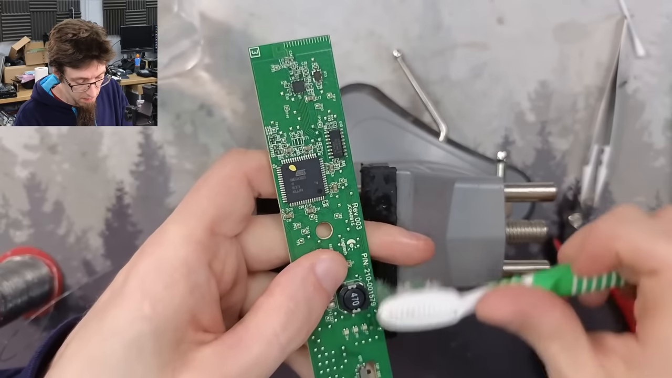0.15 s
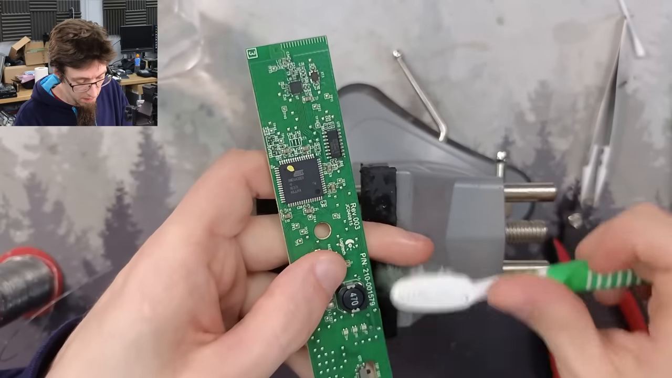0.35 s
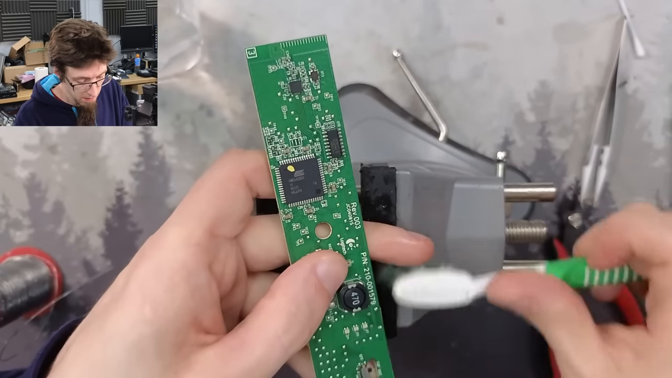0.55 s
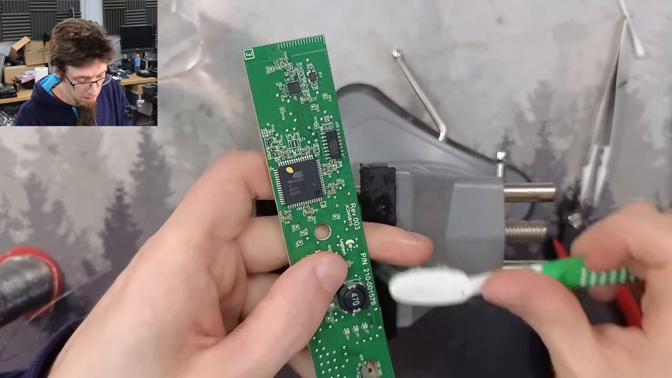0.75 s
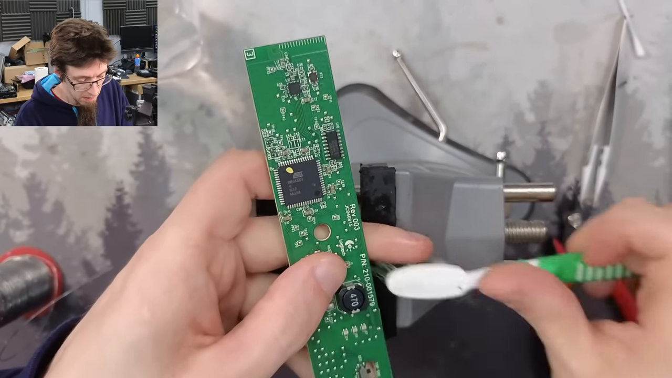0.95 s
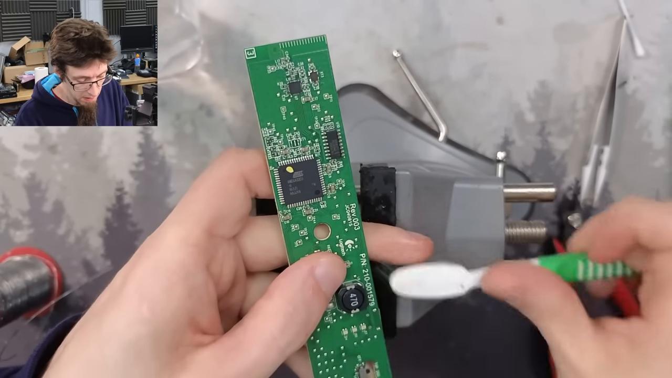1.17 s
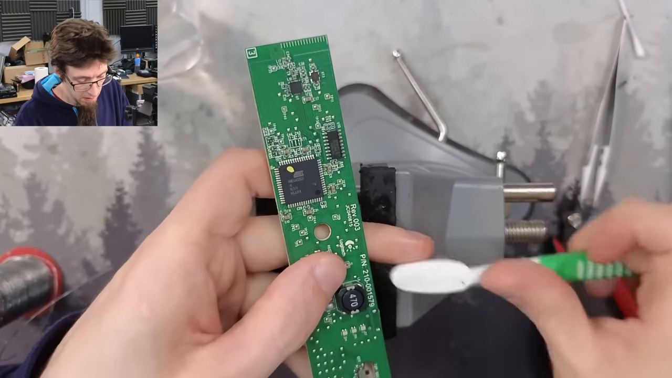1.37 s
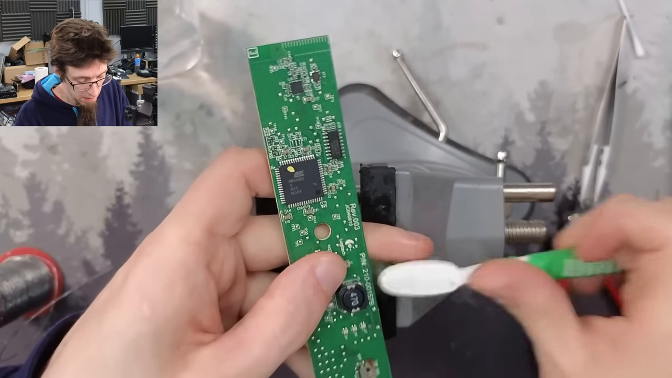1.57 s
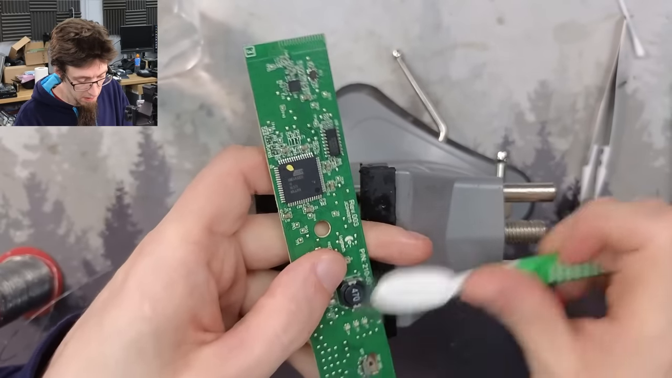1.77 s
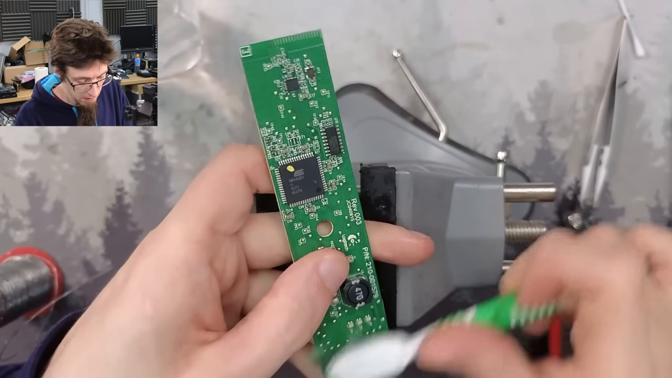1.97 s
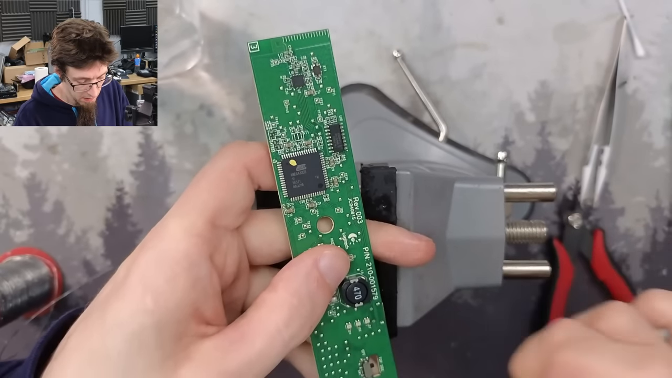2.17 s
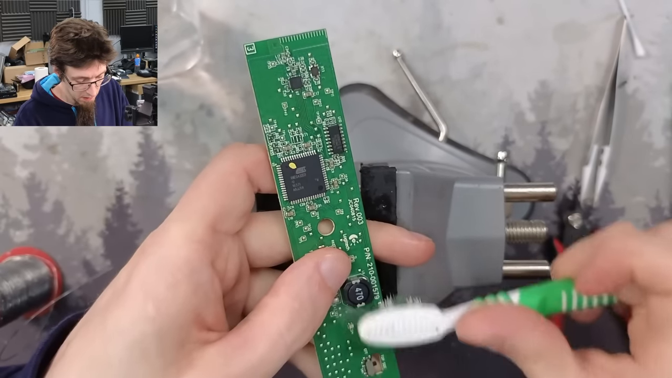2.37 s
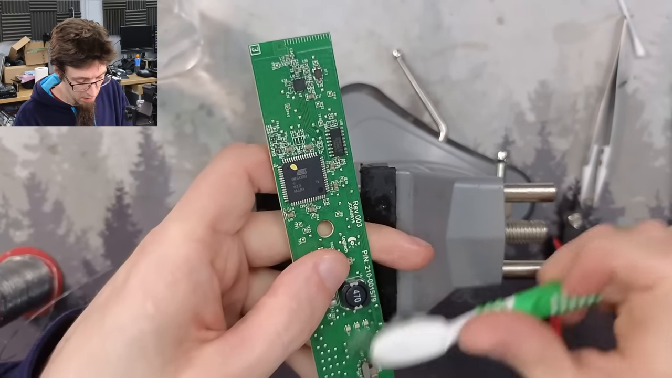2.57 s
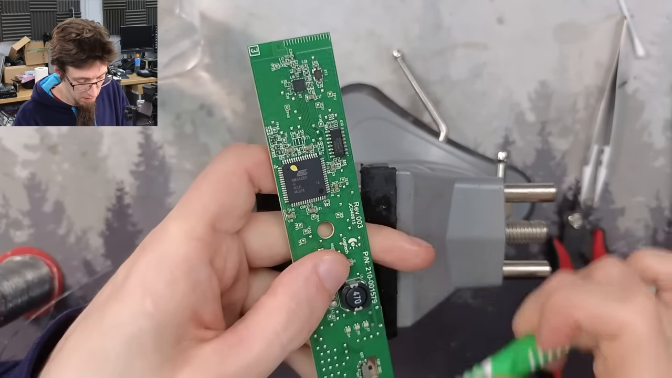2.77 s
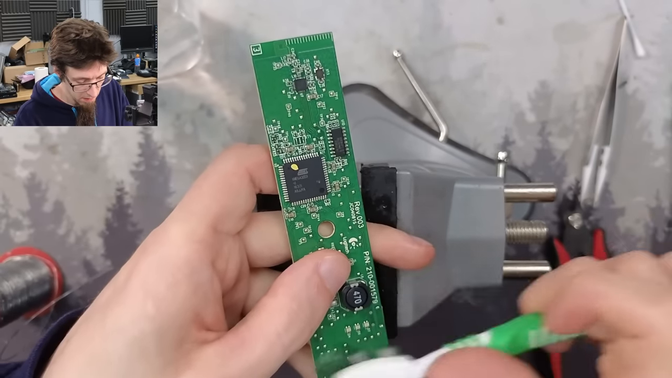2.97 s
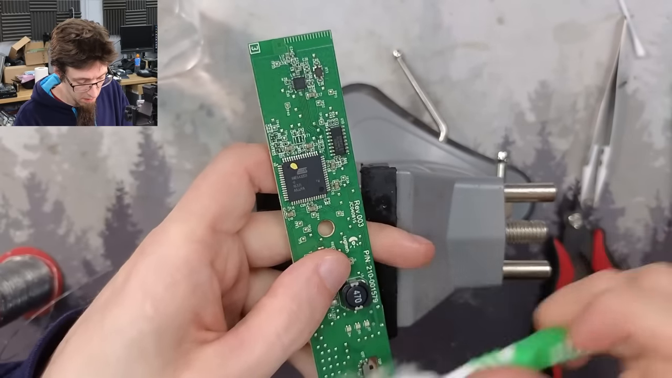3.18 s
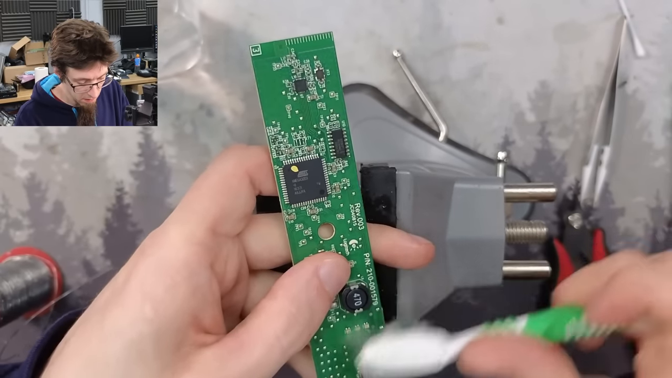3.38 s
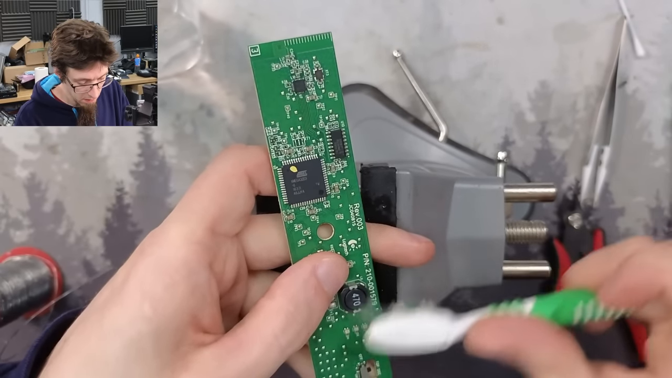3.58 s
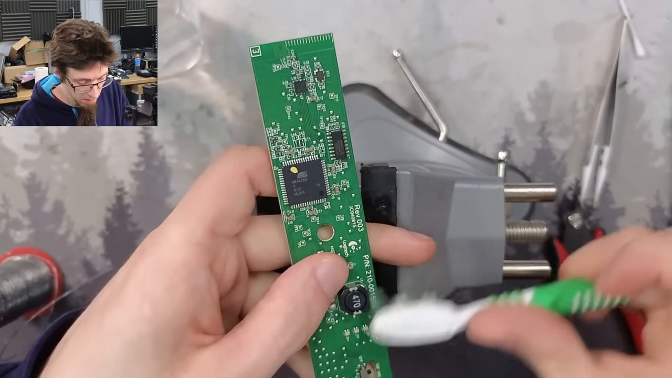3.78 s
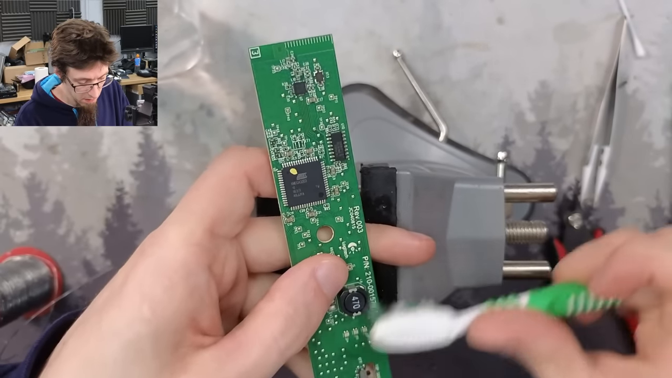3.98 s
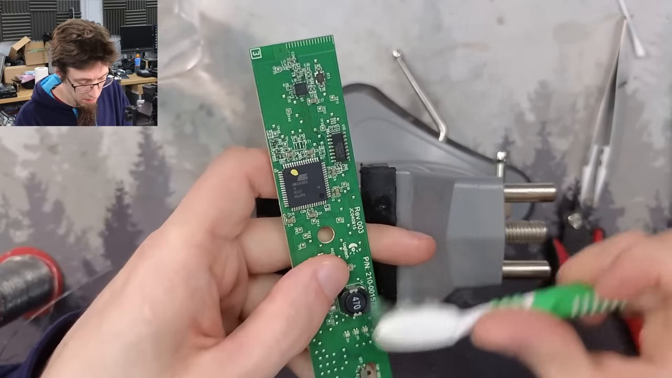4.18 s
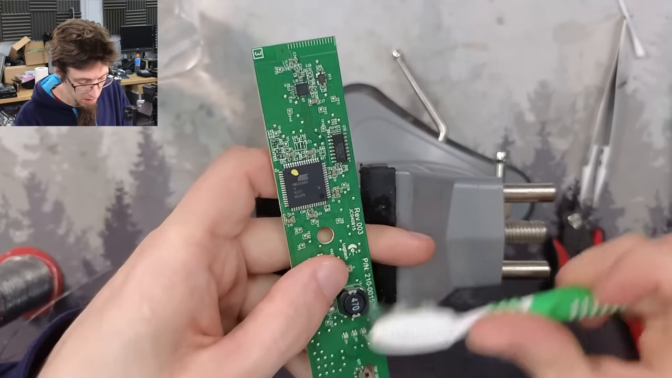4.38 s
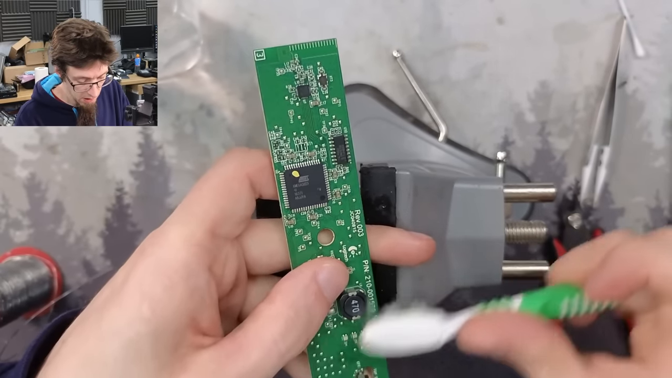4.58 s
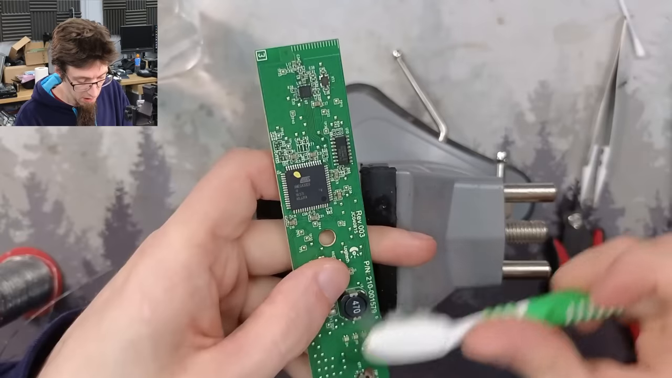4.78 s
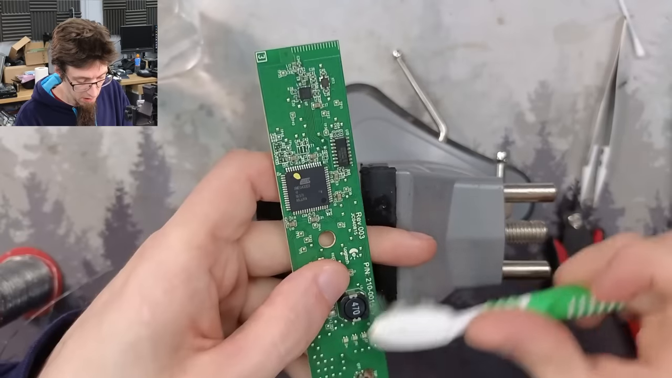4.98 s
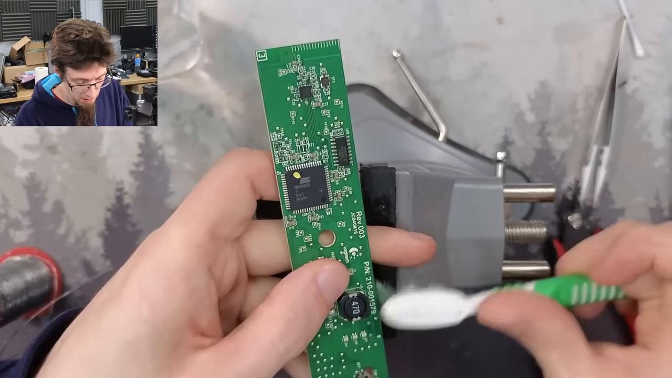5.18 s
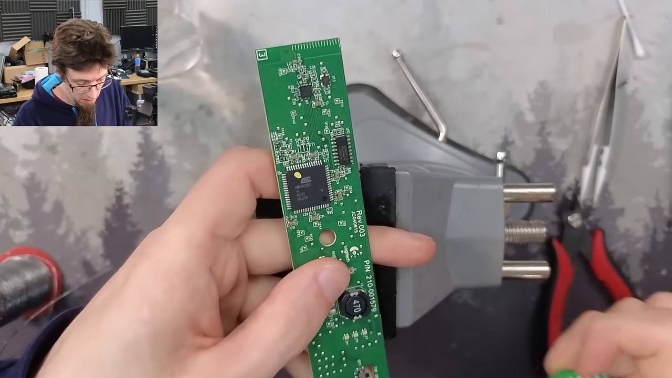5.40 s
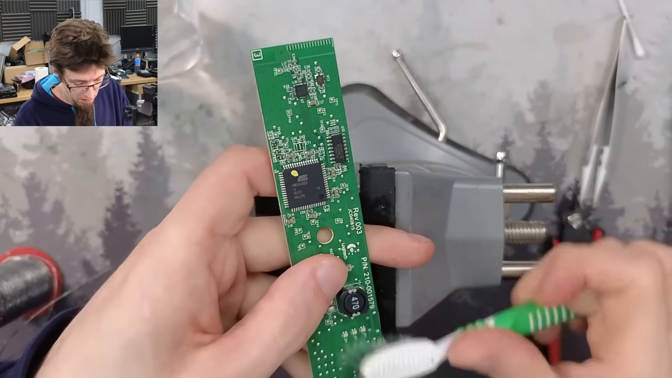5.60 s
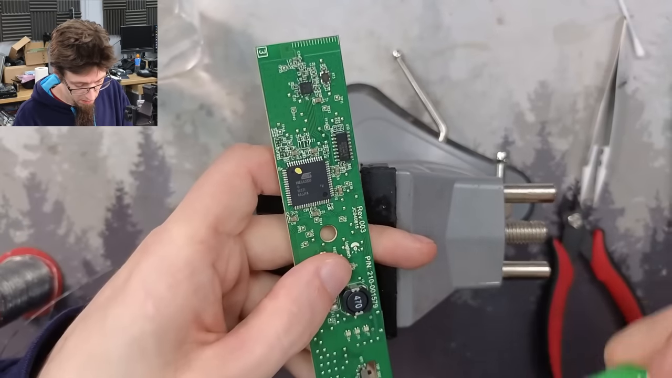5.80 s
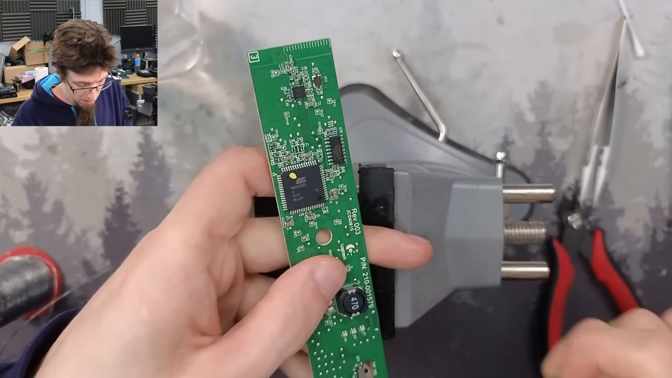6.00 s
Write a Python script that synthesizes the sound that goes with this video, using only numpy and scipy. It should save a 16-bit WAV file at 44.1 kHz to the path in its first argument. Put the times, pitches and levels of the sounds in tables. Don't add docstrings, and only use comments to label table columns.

```python
import sys
import numpy as np
from scipy import signal
from scipy.fft import rfft, irfft, next_fast_len
from scipy.io import wavfile
from scipy.ndimage import uniform_filter1d

SR = 44100
rng = np.random.default_rng(int(sys.argv[2]) if len(sys.argv) > 2 else 0)


def makeup_ratio(level_db):
    decades = np.asarray(level_db, float) / 20
    return 10 ** decades


def wav_record(signal):
    frames = np.transpose(np.atleast_2d(signal))
    bounded = np.clip(frames, -1, 1)
    quanta = np.round(bounded * 32767).astype(np.int16)
    wavfile.write(sys.argv[1], SR, quanta)


N = 266716
T = np.arange(N) / SR

# (frequency [Hz], level [dB per Hz])
BRISTLE = [(1650, -49), (2800, -10), (3360, 0.5), (5400, -5.5), (5890, 1.5), (7170, -7), (7440, -1),
           (8120, 1), (10200, -4), (11300, 0.5), (12200, -6), (14100, 1), (16000, -13.5)]
# (frequency [Hz], level [dB per Hz])
BOARD = [(220, -23), (380, -4), (1010, -3), (1150, -6), (1380, -1), (1540, -3), (2200, 1.5), (2780, -11),
         (3000, -3), (3900, -21), (6600, -120)]
# (brisk stroke [dB], slow stroke [dB])
EASED_BOARD_DB = (-9.5, -6)
BOARD_DB, SQUEAK_DB = (-8, -14), (-0.23, 1.9)
SQUEAK_HZ = 5790
TIRED_S, TIRED_SQUEAK_DB = 5.2, 1.3
LIGHT_TILT_DB, LIGHT_PATCHY = -15.5, 1.7


def brush():
    hiss_db, pressure, stroke = stroke_controls()
    lean_db = np.transpose(LANDINGS)[3]
    board_db = (manner(BOARD_DB) + lean_db)[stroke]
    squeak_db = manner(SQUEAK_DB)[stroke] + TIRED_SQUEAK_DB * (T > TIRED_S)
    light = 1 - pressure

    tips = flicks(9000, spread_db=1.0) * makeup_ratio(0.84 * walk(250))
    patchy_db = 2.25 * (1 + (LIGHT_PATCHY - 1) * light)
    hiss = 0
    for k, hz in enumerate(np.geomspace(2800, 16000, num=36)):
        ratio = hz / SQUEAK_HZ
        octaves_off = max(np.log2(SQUEAK_HZ / hz), np.log2(hz / 9500), 0)
        tuft_db = patchy_db * ratio ** 0.24 * walk(30) + LIGHT_TILT_DB * light * octaves_off
        tuft_db += 2 * squeak_db * (abs(np.log2(ratio)) < .1)
        hiss = hiss + (-1) ** k * slow_amp(tuft_db) * resonate(tips, hz, 24 * ratio ** 0.41)

    drag = flicks(2300, spread_db=0.5) * makeup_ratio(2.5 * walk(120))
    board = 0
    for k, hz in enumerate(np.geomspace(400, 2900, num=16)):
        mode_db = 3.6 * walk(35) + 0.41 * (board_db + 5.5) * (hz < 1000)
        board = board + (-1) ** k * slow_amp(mode_db) * resonate(drag, hz, 9.1)
    board_gain = makeup_ratio(board_db + manner(EASED_BOARD_DB)[stroke] * light)
    board = board_gain * level(colour(board, BOARD), 0.98)
    return makeup_ratio(hiss_db) * (level(colour(hiss, BRISTLE), -0.54) + board)


# (landing [s], full contact [s], lift-off [s], force at lift-off [dB], landing softness [dB])
BRISK = [(.02, .06, 0.126, -40.5, -13), (.247, .273, 0.32, -42.5, -8.5), (.443, .492, 0.53, -42, -11.5),
         (.641, .676, 0.74, -42, -11.5), (.854, .888, 0.95, -43, -11), (1.067, 1.11, 1.157, -40, -14.5),
         (1.282, 1.316, 1.365, -42.5, -13.5), (1.49, 1.53, 1.578, -42.5, -9.5),
         (1.712, 1.737, 1.797, -41.5, -11.5), (1.94, 1.965, 2.039, -43, -7),
         (2.976, 3.03, 3.092, -43.5, -23), (3.24, 3.27, 3.326, -43, -6.5), (3.443, 3.482, 3.537, -42, -14),
         (3.647, 3.676, 3.735, -41.5, -16), (3.852, 3.897, 3.934, -40.5, -16.5),
         (4.053, 4.083, 4.131, -42, -16.5), (4.256, 4.289, 4.345, -42.5, -14.5),
         (4.444, 4.481, 4.536, -42.5, -13.5), (4.644, 4.686, 4.726, -42, -21),
         (4.848, 4.89, 4.923, -42.5, -10.5), (5.06, 5.098, 5.139, -44, -15)]
# (landing [s], full contact [s], lift-off [s], force at lift-off [dB], landing softness [dB])
SLOW = [
    (2.193, 2.225, 2.298, -46.5, -5.5),
    (2.483, 2.553, 2.61, -49, -15.5),
    (2.737, 2.8, 2.865, -48.5, -25),
    (5.282, 5.308, 5.4, -51, -10.5),
    (5.6, 5.63, 5.73, -52.5, -11),
    (5.914, 5.948, 6.03, -50, -14.5),
]
APPROACH_S, APPROACH_DB = .016, -16.5
SETTLE_S, SETTLED_DB = 0.016, 1.6
DIG_DB, SWELL_DB = (-3.5, -1), (2, 2.5)
SPRING_S = 0.022
SPRING_DB, FADE_DB_S = (-17.5, -10.5), (180.5, 275)


def stroke_controls():
    land_s, press_s, lift_s, lift_db, soft_db = np.transpose(sorted(BRISK + SLOW))
    land_db = lift_db + soft_db
    press_db = lift_db + manner(DIG_DB)
    swell_db = (press_db + lift_db) / 2 + manner(SWELL_DB)
    drop_db = manner(SPRING_DB)
    free_s = lift_s + SPRING_S
    free_db = lift_db + drop_db
    end_s = np.maximum(np.append(land_s[1:] - APPROACH_S, T[-1]), free_s)
    end_db = free_db - manner(FADE_DB_S) * (end_s - free_s)

    settled_s = np.minimum(land_s + SETTLE_S, press_s)
    swell_s = (press_s + lift_s) / 2
    knots = [land_s - .002, land_s, settled_s, press_s, swell_s,
             lift_s, lift_s + .3 * SPRING_S, free_s, end_s]
    db = [land_db + APPROACH_DB, land_db, land_db + SETTLED_DB, press_db, swell_db,
          lift_db, lift_db + 0.66 * drop_db, free_db, end_db]
    force = [0.015, 0.019, 0.13, 0.42, 0.77, 1.0, 0.98, 1, 0.35]
    knots = np.transpose(knots).ravel()
    hiss_db = np.interp(T, knots, np.transpose(db).ravel(), left=-90)
    pressure = np.interp(T, knots, np.tile(force, len(land_s)))
    stroke = np.maximum(np.searchsorted(land_s - APPROACH_S, T) - 1, 0)
    return hiss_db, pressure, stroke


def manner(pair):
    return np.array([pair[row in SLOW] for row in sorted(BRISK + SLOW)])


# (time [s], peak [dB], main ring [Hz], lean on the board [dB])
LANDINGS = [(0.0207, -37.7, 7800, 0.1), (0.2465, -34.5, 7800, 0.7), (0.4443, -37.4, 6290, -0.1),
            (0.6414, -38.6, 7250, 0.6), (0.854, -36.0, 8120, 1.7), (1.066, -36.8, 6270, 2.3),
            (1.2815, -39.2, 7780, 1.2), (1.4905, -35.4, 6430, 1.9), (1.713, -30.8, 8120, 3.2),
            (1.94, -39.3, 9600, 2.2), (2.1934, -29.9, 5840, -1.6), (2.483, -41.2, 5710, 0.3),
            (2.735, -51.1, 5540, -4.9), (2.9753, -45.6, 7430, 1.8), (3.2405, -33.4, 7870, -1.1),
            (3.4431, -46.3, 7500, 0.6), (3.6471, -41.0, 7730, 0.7), (3.8516, -44.0, 7760, 3.6),
            (4.054, -37.6, 7700, 0.9), (4.2558, -40.0, 7810, -0.1), (4.4448, -44.6, 7400, -2.5),
            (4.6443, -45.6, 7600, 0.7), (4.8484, -32.9, 7740, 0.0), (5.0599, -39.6, 8380, 1.4),
            (5.2849, -39.5, 8600, -1.7), (5.6067, -46.9, 8340, -3.3), (5.917, -46.3, 7566, 1.2)]
# (time [s], peak [dB], main ring [Hz])
TICKS = [(0.587, -43, 6030), (.7963, -51.5, 8670), (.127, -33, 6440), (1.2225, -40.5, 8030),
         (1.4175, -44, 9650), (1.52, -35, 6070), (1.717, -33.5, 8200), (1.7455, -36.5, 9970),
         (1.857, -38, 5970), (1.9737, -29.5, 8560), (2.2298, -29.5, 8030), (2.5311, -43, 7650),
         (2.779, -37.5, 7650), (2.9116, -51, 7860), (3.0278, -33, 7800), (3.1529, -52, 7990),
         (3.469, -42, 7770), (3.795, -41.5, 8130), (3.982, -50, 3500), (4.189, -49, 3010),
         (4.396, -48, 7960), (4.586, -40.5, 8100), (4.792, -50, 8060), (4.9923, -44, 7800),
         (5.208, -52, 8000), (5.2976, -43, 7910), (5.935, -48.5, 7940)]
# (frequency [Hz], level [dB], time to fall 60 dB [s])
TUFT = [(3600, -18.5, 0.03), (5840, -9.5, 0.029), (7754, -1, 0.017), (9850, -3, 0.012), (11230, -7, 0.011),
        (13300, -13, 0.011)]
TIRED_DB = -8


def ticks():
    out = np.zeros(N)
    rows = [(s, db + TIRED_DB * (s > TIRED_S), hz) for s, db, hz, _ in LANDINGS] + TICKS
    for (s, db, hz), chance in zip(rows, rng.standard_normal(size=(len(rows), 500))):
        modes = [(hz, -2.5, .018)]
        for (mode_hz, mode_db, t60), c, e in zip(TUFT, chance, chance[9:]):
            modes.append((mode_hz * (1 + .03 * c), mode_db + 3 * e, t60))
        snaps = chance ** 3 * np.exp(-T[:len(chance)] / 0.0059)
        burst = np.convolve(ring(modes, 0.00021), snaps)
        add(out, s, makeup_ratio(db - 2.5) * burst / np.abs(burst).max())
    return out


# (time [s], peak [dB], ring [Hz], hollow mode [dB], side rings [dB])
RAPS = [
    (.0876, -9, 2430, -31.5, -13),
    (.1112, -11, 3070, -14.5, -7),
    (.1164, -18, 2230, -18, -6.5),
    (1.1399, -12.5, 2375, -20.5, -16),
    (1.1551, -17, 2280, -15, -11),
    (5.6114, -21.5, 2013, -23, -27),
]
# (time [s], peak [dB], ring [Hz], hollow mode [dB])
KNOCKS = [(0.3211, -38.5, 3580, -18), (.5194, -40, 3540, -19), (.733, -39, 1740, -23),
          (0.9313, -51, 1910, -22), (1.192, -32.5, 2240, -14.5), (1.3642, -29.5, 2240, -42),
          (1.5787, -43, 1650, -10.5), (1.7969, -32.5, 2250, -32.5), (2.0293, -44.5, 2050, -24.5),
          (2.202, -45.5, 1880, -31.5), (2.487, -50.5, 1830, -29), (3.0838, -36.5, 2190, -12.5),
          (3.246, -38, 2120, -18), (3.545, -43, 2132, -22), (3.5882, -43.5, 2250, -16),
          (3.723, -43, 1800, -10), (3.9814, -41, 2240, -5), (4.1262, -32.5, 1644, -30),
          (4.1699, -44.5, 1840, -11), (4.337, -44.5, 2080, -15), (4.5244, -42, 1676, -8),
          (4.572, -43, 1904, -20), (4.9196, -37, 1794, -9), (4.9675, -44.5, 1880, -13),
          (5.1288, -44, 2130, -13), (4.7693, -47, 2460, -18.5), (4.1344, -46, 2200, -20),
          (6.0424, -48, 1500, -6)]
# (time [s], peak [dB])
TAPS = [(3.576, -56), (3.589, -46), (3.608, -60), (3.625, -58), (3.6394, -58), (3.656, -61), (3.7397, -53),
        (3.7687, -53), (3.78, -54), (3.8083, -53), (3.939, -48), (3.9686, -47), (4.0074, -53),
        (4.021, -53.5), (4.037, -53), (4.052, -61), (4.068, -58)]
SIDE_RINGS = [.72, 1.35]
# (frequency [Hz], level [dB], time to fall 60 dB [s])
THUD = [(126, -3, 0.12), (259, -1, 0.029), (464, -3.5, 0.021)]
# (frequency [Hz], time to fall 60 dB [s])
BENCH = [(33, 0.24), (93, 0.8), (298, 0.16)]
# (time [s], thud [dB], first, second and third bench mode [dB each])
JOLTS = [
    (0.111, -41, -19, -44, -37.5),
    (1.157, -45, -30.5, -37, -44.5),
    (1.366, -44, -46.5, -58, -61.5),
    (1.795, -42, -38, -42.5, -55),
    (3.738, -33.5, -30, -36.5, -59),
    (5.612, -45, -47.5, -46.5, -47.5),
]
# (time [s], peak [dB])
BUMPS = [(0.359, -50), (1.492, -49), (1.545, -49), (1.712, -48), (1.936, -48), (3.441, -49), (3.541, -44),
         (4.3, -47), (4.649, -56), (4.838, -43), (5.501, -57.5), (6.039, -45)]
CONTACT_S, AFTER_RING_DB, RING_T60_S = 0.0012, -13, 0.021
HOLLOW_HZ, HOLLOW_T60_S = 920, 0.028
TAP_HZ, TAP_HOLLOW_DB, SIDE_DB, BUMP_DB = 1329.6, -2, -11.5, -3.5
USUAL_DB = -43
THUD_DB, THUD_PER_DB = -13.5, -0.33


def knocks():
    air, bench = np.zeros(N), np.zeros(N)
    t = T[:SR // 80]
    contact = np.exp(-((t - 1.28 * CONTACT_S) / CONTACT_S) ** 2)
    rows = RAPS + [(*row, SIDE_DB) for row in KNOCKS]
    rows = rows + [(s, db, TAP_HZ, TAP_HOLLOW_DB, SIDE_DB) for s, db in TAPS]
    for (s, db, hz, hollow_db, side_db), chance in zip(rows, rng.standard_normal(len(rows))):
        clack = np.sin(2 * np.pi * hz * t)
        for ratio in SIDE_RINGS:
            clack += makeup_ratio(side_db) * np.sin(2 * np.pi * hz * ratio * t)
        add(air, s, makeup_ratio(db - 5.0) * contact * clack)
        hollow = (HOLLOW_HZ * (1 + 0.071 * chance), hollow_db + 7.5, HOLLOW_T60_S)
        add(air, s, makeup_ratio(db - 2.5) * ring([(hz, AFTER_RING_DB, RING_T60_S), hollow], 0.0011))
        thud_db = THUD_DB + THUD_PER_DB * (db - USUAL_DB)
        add(air, s, makeup_ratio(db + thud_db + 7.0) * ring(THUD, .001))

    for s, thud_db, *mode_db in JOLTS:
        add(bench, s, makeup_ratio(thud_db) * ring(THUD, 0.00073))
        modes = [(hz, db, t60) for (hz, t60), db in zip(BENCH, mode_db)]
        add(bench, s, ring(modes, 0.00059))
    for s, db in BUMPS:
        add(bench, s, makeup_ratio(db + BUMP_DB) * ring(THUD, 0.00092))
    return air, bench


# (time [s], peak [dB], low modes [dB], long-ringing modes [dB])
CLINKS = [
    (0.0879, -15.5, 6, -1.5),
    (0.105, -35, -0.5, -2),
    (0.1118, -15.5, -10.5, -3),
    (0.1158, -18, -7, -2),
    (0.1172, -19, -6.5, 0.5),
    (1.1404, -21.5, 6, 0),
    (1.146, -29.5, -2.5, -6),
    (1.158, -23, -3, 2),
    (1.197, -50, 9, -17),
]
# (frequency [Hz], level [dB], time to fall 60 dB [s])
STEEL = [(4000, -19.5, 0.091), (4260, -34.5, 0.29), (5330, -8.5, 0.02), (8266, 0, 0.089),
         (8350, -10, 0.037), (8300, -35, 0.26), (8030, -16, 0.074), (8360, -15.5, .09), (8240, -6, .07),
         (8250, -36, .4), (10940, -9, 0.11), (10770, -38, 0.67), (13340, -16, 0.12), (14400, -26, .2)]
RATTLE_DB, RATTLE_RAD = 2.6, .9
HIGH_PER_DB = 0.06
CRACK_DB = -8


def steel():
    out = np.zeros(N)
    hz, _, t60 = np.transpose(STEEL)[:, :, None]
    rattle = []
    for _ in STEEL:
        strength = slow_amp(RATTLE_DB * walk(250)[:2 * SR])
        rattle.append(strength * np.cos(RATTLE_RAD * walk(120)[:2 * SR]))
    rattle = np.array(rattle)
    for (s, db, low_db, free_db), chance in zip(CLINKS, rng.standard_normal((len(CLINKS), len(STEEL), 1))):
        struck_db = low_db * (hz < 6000) + HIGH_PER_DB * low_db * (hz > 10000)
        mix_db = 1.5 * chance + np.where(t60 > .25, free_db, struck_db)
        crack = resonate(rng.standard_normal(SR // 30), 2900, 1.3) * np.exp(-T[:SR // 30] / 0.0087)
        add(out, s, makeup_ratio(db + low_db + CRACK_DB) * crack)
        shaken = rattle[:, int(s * SR):][:, :int(SR * t60.max())]
        add(out, s, makeup_ratio(db - 4.0) * ring(STEEL, 0.00024, makeup_ratio(mix_db) * shaken))
    return out * makeup_ratio(1.6 * walk(60.3))


# (time [s], length [s], level [dB], ring [Hz])
CREAK = [
    (1.401, 0.11, -63, 920),
    (3.282, .12, -64, 920),
    (3.576, 0.13, -61, 930),
    (3.741, 0.06, -54, 980),
    (3.965, .12, -60.5, 924),
]
CREAK_ATTACK_S, CREAK_RELEASE_S, CREAK_EDGE_DB = 0.015, 0.032, -4


def creak():
    out = np.zeros(N)
    slips = flicks(1500, spread_db=1.3) * makeup_ratio(2.4 * walk(70))
    for s, length, db, hz in CREAK:
        span = slice(int(s * SR), int((s + length) * SR))
        rise, fall = (T[span] - s) / CREAK_ATTACK_S, (s + length - T[span]) / CREAK_RELEASE_S
        inside = np.minimum(np.minimum(rise, fall), 1)
        hollow = resonate(resonate(slips[span], hz, 4), hz, 4)
        upper = resonate(resonate(slips[span], 1.94 * hz, 2.3), 2.3 * hz, 2.2)
        out[span] = level(hollow + makeup_ratio(-14) * upper, -2.5) * makeup_ratio(db + CREAK_EDGE_DB * (1 - inside))
    return out


# (time [s], sway [Hz], sway [dB], shake [dB])
ROCKING = [(0, 12.94, -41, -39.5), (.12, 14.31, -35, -25.5), (.27, 13.9, -28.5, -35.5),
           (.52, 14.14, -27.5, -33.5), (1.03, 14.8, -33.5, -41), (1.26, 14.5, -45.5, -51.5),
           (1.4, 14.3, -28, -32), (2.05, 14.2, -23, -36), (2.21, 16.3, -31, -39), (2.4, 15.5, -53.5, -60.5),
           (2.66, 15.3, -26, -43.5), (3.23, 15.5, -49, -51.5), (3.37, 15.43, -27, -33),
           (4.9, 16.35, -24.5, -37), (5.24, 14.7, -20.5, -41), (5.69, 14.3, -31.5, -46),
           (5.91, 14.9, -57.5, -66.5), (6.05, 16, -34, -49.5)]
# (frequency [Hz], level [dB per Hz])
RUMBLE = [(13, -28), (22, 2.5), (31, 6), (75, -24.5), (99, -29), (232, -50), (295, -43.5), (350, -49),
          (400, -56.5), (520, -81.5), (880, -120)]
PULSE_DB = 4.5
DRUM_DB, DRUM_PER_DB, DRUM_JOLT_DB, DRUM_FADE_DB_S = -56.5, 0.66, -2.5, 130
PANEL_DB, PANEL_PER_DB, PANEL_JOLT_DB, PANEL_FADE_DB_S = -74, 0.76, -31, 30
HUM_S, HUM_LENGTH_S, HUM_DB = .585, 0.235, -58.5


def rocking():
    s, *columns = np.transpose(ROCKING)
    sway_hz, sway_db, shake_db = (np.interp(T, s, c) for c in columns)
    sway = np.sqrt(2) * makeup_ratio(sway_db) * np.sin(2 * np.pi * np.cumsum(sway_hz) / SR)

    extra_db = shake_db - USUAL_DB
    drum_gain = makeup_ratio(DRUM_DB + DRUM_PER_DB * extra_db)
    drum_gain = drum_gain + makeup_ratio(DRUM_JOLT_DB) * shudder(column=3, fade_db_s=DRUM_FADE_DB_S)
    loose = makeup_ratio(PANEL_DB) + makeup_ratio(PANEL_JOLT_DB) * shudder(column=4, fade_db_s=PANEL_FADE_DB_S)
    panel_gain = makeup_ratio(PANEL_PER_DB * extra_db) * loose

    panel_hz = BENCH[2][0]
    wavering_hz = panel_hz * (.99 + .012 * walk(26.2))
    note = makeup_ratio(1.6 * walk(17.6)) * np.sin(2 * np.pi * np.cumsum(wavering_hz) / SR)
    hum = level(note, HUM_DB) * np.exp(-((T - HUM_S) / HUM_LENGTH_S) ** 8)

    digging = uniform_filter1d(np.clip((stroke_controls()[0] + 60) / 20, 0, 1), SR // 40)
    shake = rng.standard_normal(N) * makeup_ratio(2.6 * walk(15) + PULSE_DB * digging)
    rumble = makeup_ratio(shake_db) * level(colour(shake, RUMBLE, 14, 60), 0.15)
    drum = drum_gain * level(colour(shake, RUMBLE, 71, 230), 0.15)
    panel = colour(shake, RUMBLE, 200, 600)
    panel += makeup_ratio(6.0) * resonate(resonate(panel, panel_hz, 22), panel_hz, 22)
    return sway + hum + rumble + drum + panel_gain * level(panel, 0.15)


def shudder(column, fade_db_s):
    return sum(slow_amp(row[column] - fade_db_s * (T - row[0])) * (T > row[0]) for row in JOLTS)


ROOM_DB, ROOM_T60_S, ROOM_GAP_S = -18.5, 0.24, 0.0058


def room(x):
    t = T[:SR // 2]
    tail = rng.standard_normal(len(t)) * np.exp(-np.log(1000) * t / ROOM_T60_S) * (t > ROOM_GAP_S)
    tail = colour(tail, [(300, 15.5), (4000, 0), (15000, -8.5)])
    return signal.fftconvolve(x, makeup_ratio(ROOM_DB) * tail / np.sqrt(np.sum(tail ** 2)))[:N]


PATCH_HZ, PATCH_S, PATCH_SHARE = 700, .07, .3


def patches(x):
    hz, s, z = signal.stft(x, SR, nperseg=1024)
    band = (hz / PATCH_HZ).astype(int)[:, None]
    chance = rng.random((band.max() + 1, int(s[-1] / PATCH_S) + 3))
    moment = 1 + (s / PATCH_S + chance[band, 0]).astype(int)
    kept = chance[band, moment] < PATCH_SHARE
    return signal.istft(z * kept, SR, nperseg=1024)[1][:N] / np.sqrt(PATCH_SHARE)


def level(x, db):
    return x * makeup_ratio(db) / np.sqrt(np.mean(x ** 2))


def colour(x, points, lo_hz=1., hi_hz=22050.):
    size = next_fast_len(len(x))
    hz = np.maximum(np.arange(size // 2 + 1) * SR / size, 1e-3)
    at, db = np.transpose(points)
    edges = 1 / np.sqrt((1 + (lo_hz / hz) ** 12) * (1 + (hz / hi_hz) ** 12))
    gain = makeup_ratio(np.interp(np.log(hz), np.log(at), db)) * edges
    return irfft(rfft(x, size) * gain, size)[:len(x)]


def walk(rate):
    k = int(SR / rate)
    return uniform_filter1d(np.repeat(rng.standard_normal(N // k + 1), k), k)[:N]


def ring(modes, push_s, signs=1):
    hz, db, t60 = np.transpose(modes)[:, :, None]
    t = T[:int(SR * min(t60.max(), 1))]
    fade = np.exp(-np.log(1000) * t / t60)
    y = (signs * makeup_ratio(db) * np.sin(2 * np.pi * hz * t) * fade).sum(axis=0)
    return y * (1 - np.exp(-t / push_s))


def resonate(x, hz, sharpness):
    return signal.lfilter(*signal.iirpeak(hz, sharpness, SR), x)


def flicks(rate, spread_db):
    size = makeup_ratio(spread_db * rng.exponential(size=N)) * rng.standard_normal(N)
    return size * (rng.random(N) < rate / SR)


def slow_amp(db):
    return np.repeat(makeup_ratio(db[::8]), 8)[:len(db)]


def add(out, s, x):
    i = int(s * SR)
    out[i:i + len(x)] += x[:N - i]


# (frequency [Hz], side minus mid [dB])
WIDTH = [(60, -73), (110, -68), (200, -56), (380, -50.5), (700, -34.5), (1290, -28.5), (2380, -43.5),
         (4400, -9.5), (8120, -28.5), (15000, -16)]
KNOCK_ROOM_DB = -5


def scene():
    knock, thump = knocks()
    air = brush() + ticks() + creak() + steel()
    air = air + knock + room(air + makeup_ratio(KNOCK_ROOM_DB) * knock)
    smear = rng.standard_normal(512) * np.hanning(512)
    smeared = np.convolve(air, smear / np.sqrt(np.sum(smear ** 2)), "same")
    side = patches(colour(smeared, WIDTH, 800))
    air += level(colour(rng.standard_normal(N), BRISTLE, 3000) * makeup_ratio(2.4 * walk(15)), -90)
    air += level(colour(rng.standard_normal(N), BOARD) * makeup_ratio(3.0 * walk(8)), -87.5)
    mid = air + thump + rocking()
    return np.array([mid + side, mid - side])


def roll_off(x):
    return signal.sosfilt(signal.butter(12, 16480, fs=SR, output="sos"), x)


def record(dry):
    cut = signal.sosfilt(signal.ellip(8, .2, 70, 15900, fs=SR, output="sos"), dry)
    return roll_off(cut)


dry = scene()
out = record(dry)
wav_record(out)
```